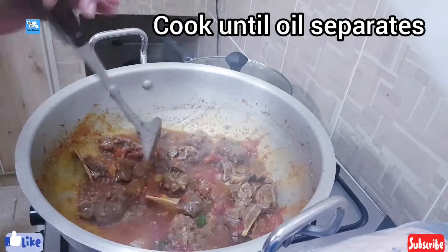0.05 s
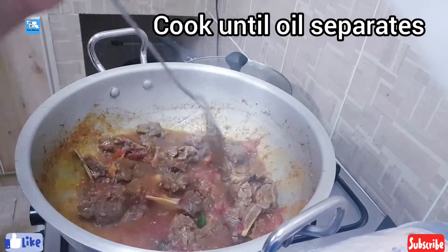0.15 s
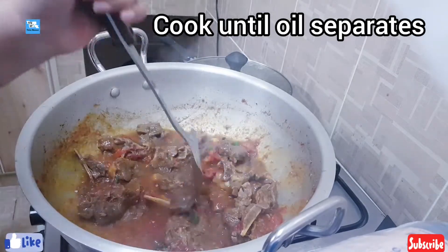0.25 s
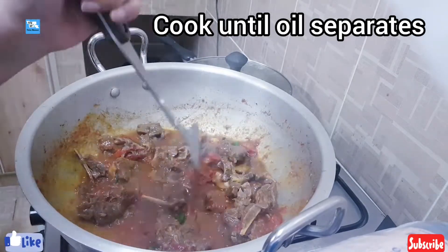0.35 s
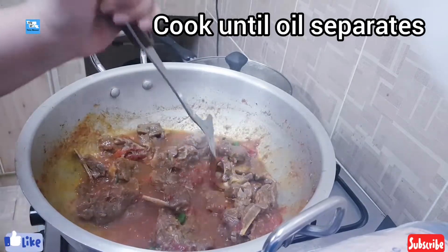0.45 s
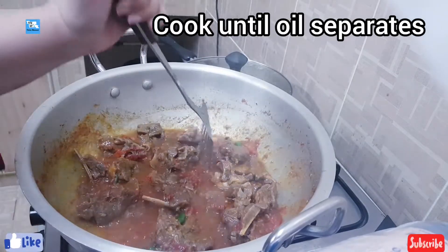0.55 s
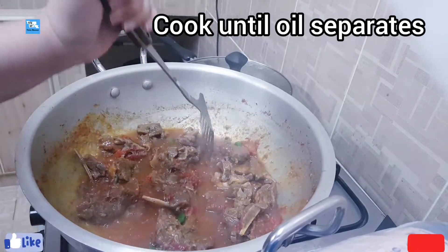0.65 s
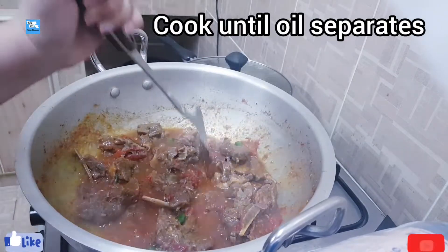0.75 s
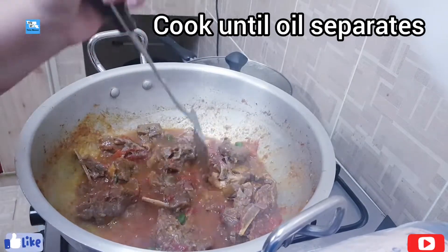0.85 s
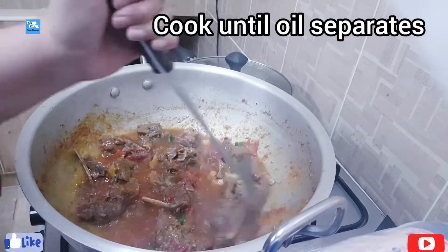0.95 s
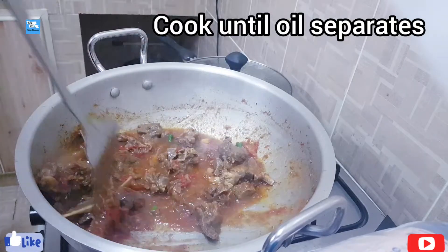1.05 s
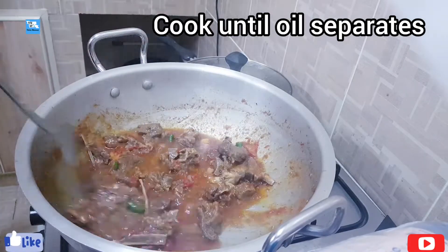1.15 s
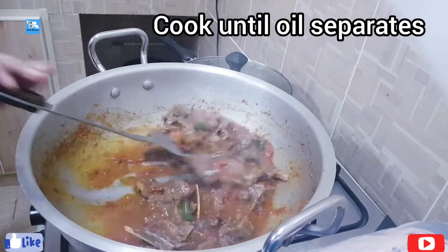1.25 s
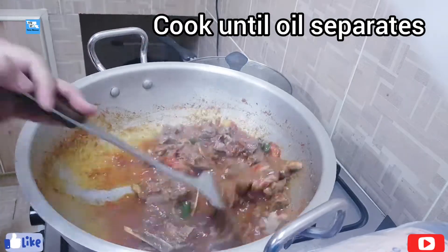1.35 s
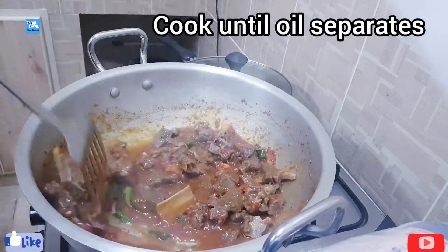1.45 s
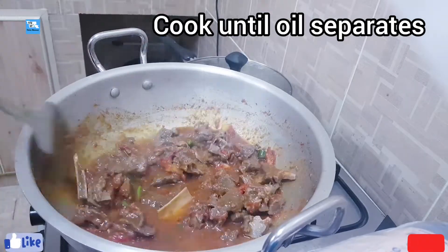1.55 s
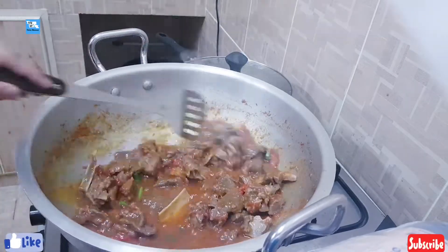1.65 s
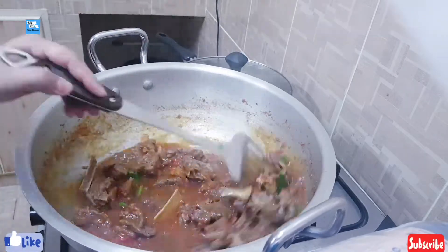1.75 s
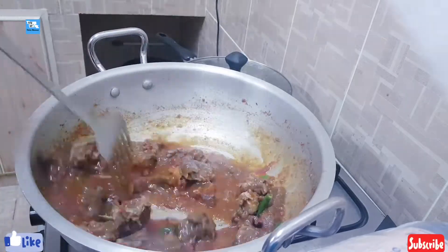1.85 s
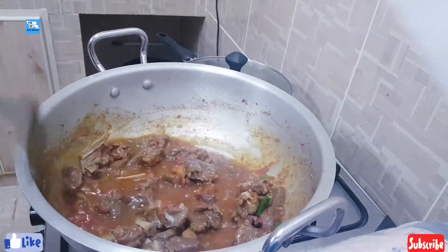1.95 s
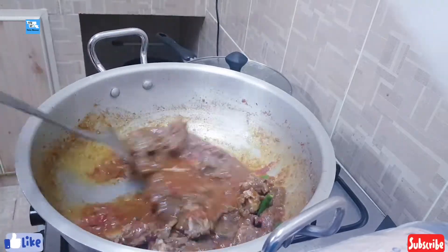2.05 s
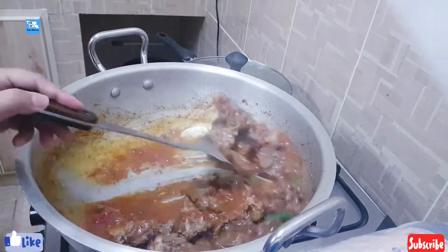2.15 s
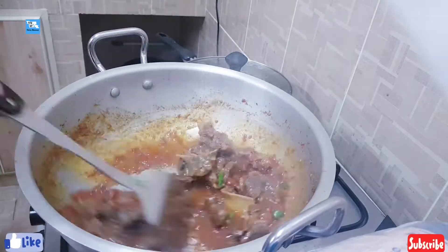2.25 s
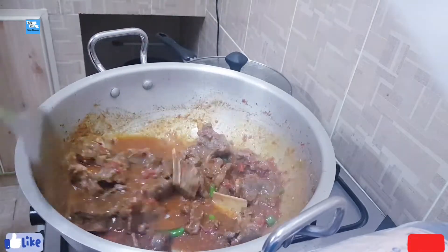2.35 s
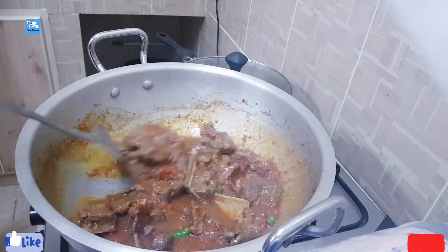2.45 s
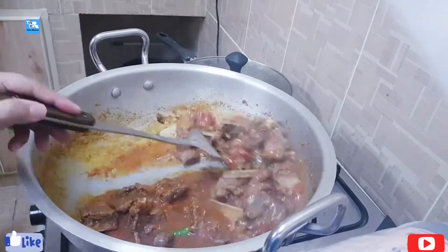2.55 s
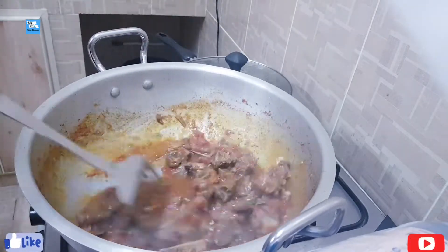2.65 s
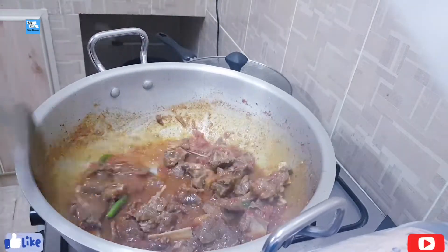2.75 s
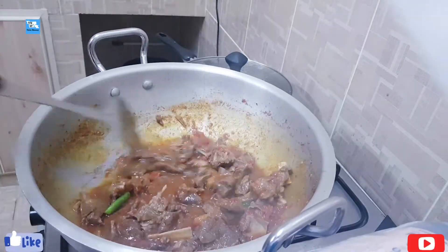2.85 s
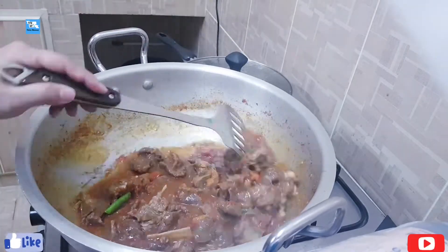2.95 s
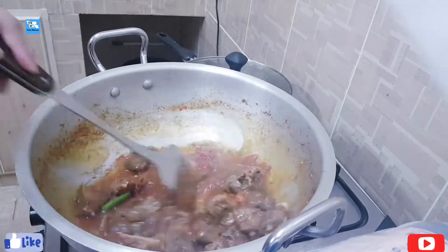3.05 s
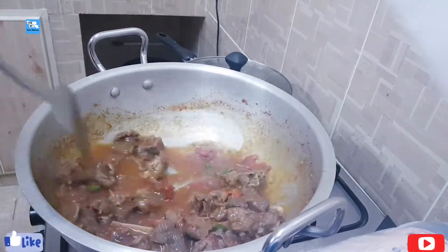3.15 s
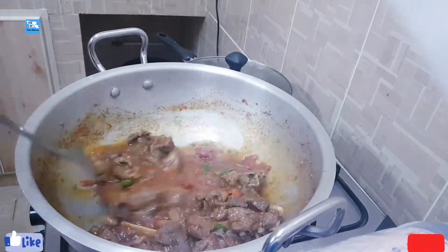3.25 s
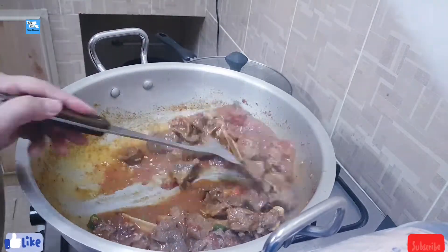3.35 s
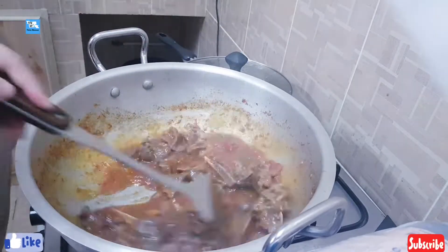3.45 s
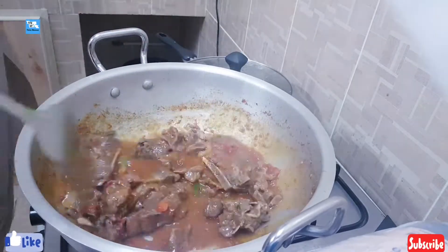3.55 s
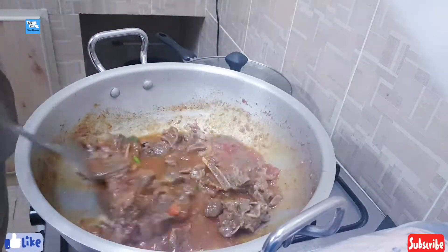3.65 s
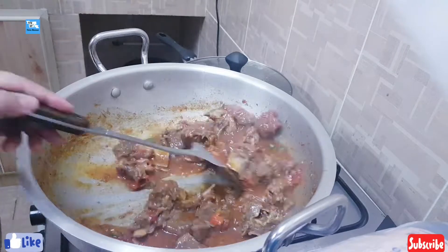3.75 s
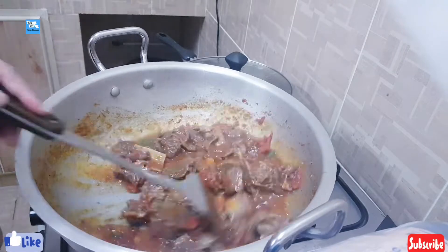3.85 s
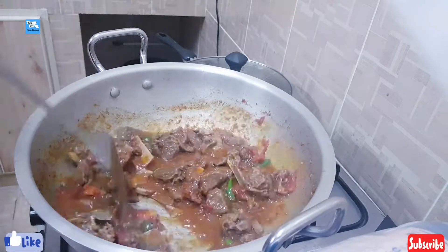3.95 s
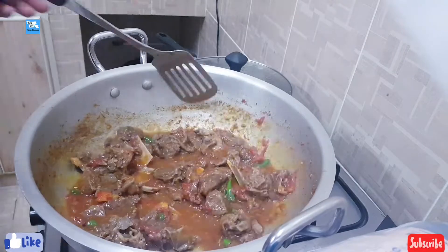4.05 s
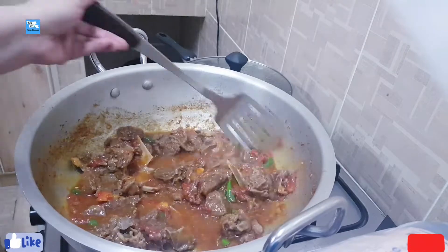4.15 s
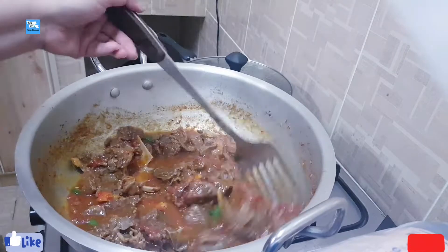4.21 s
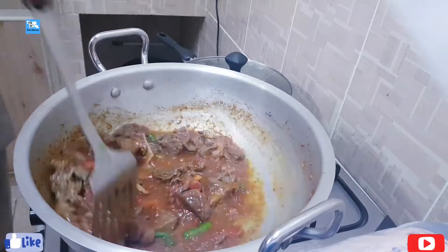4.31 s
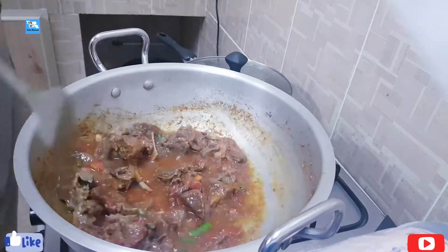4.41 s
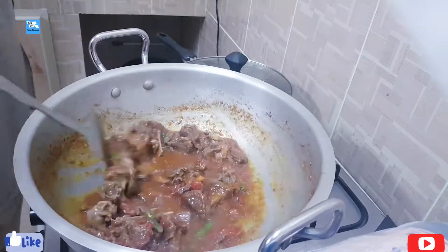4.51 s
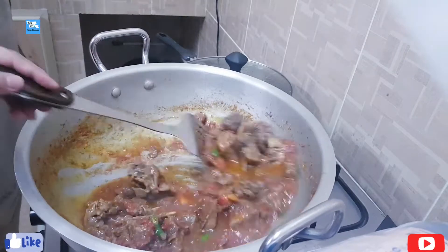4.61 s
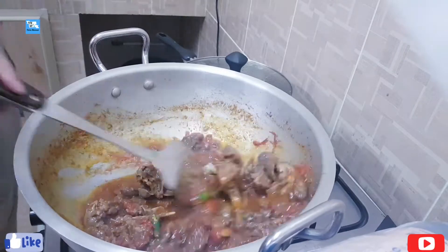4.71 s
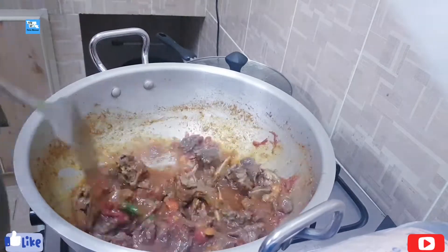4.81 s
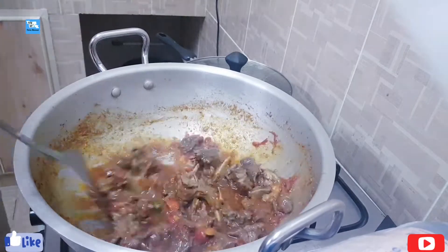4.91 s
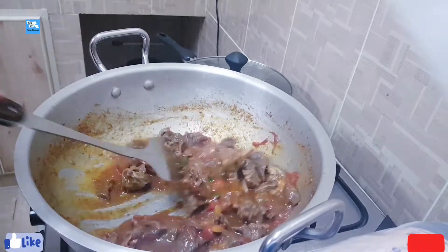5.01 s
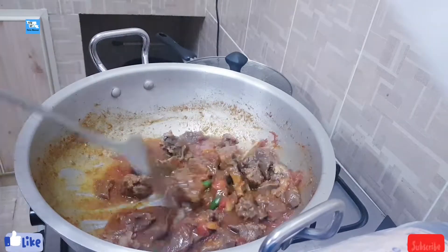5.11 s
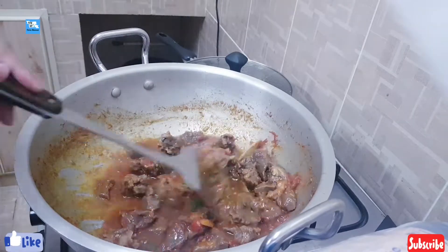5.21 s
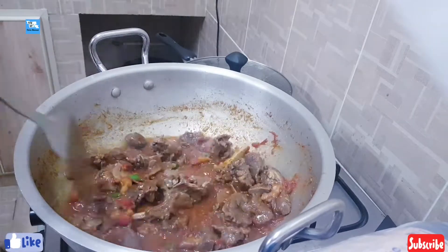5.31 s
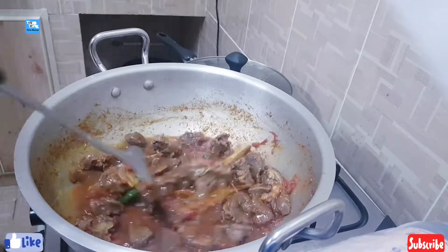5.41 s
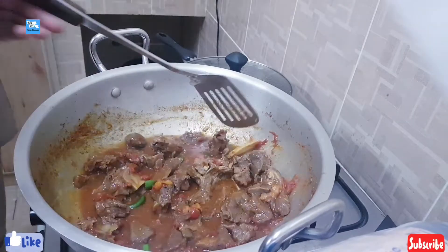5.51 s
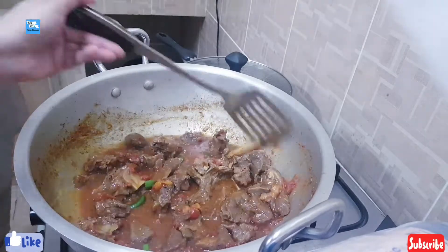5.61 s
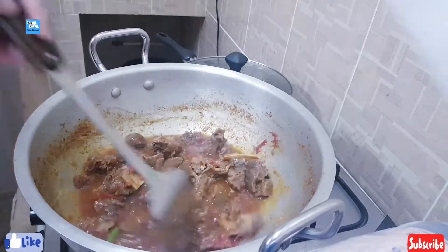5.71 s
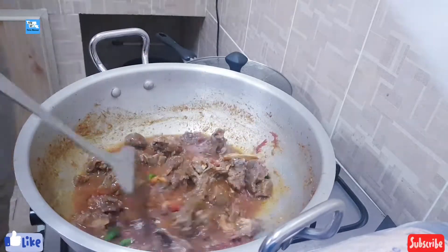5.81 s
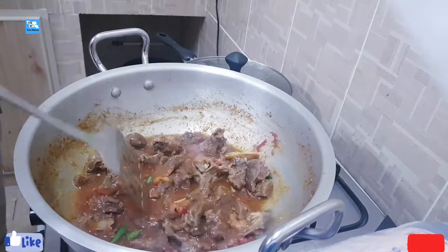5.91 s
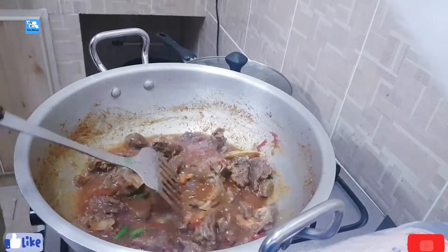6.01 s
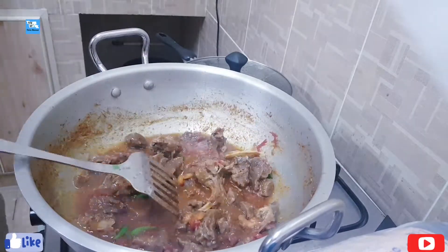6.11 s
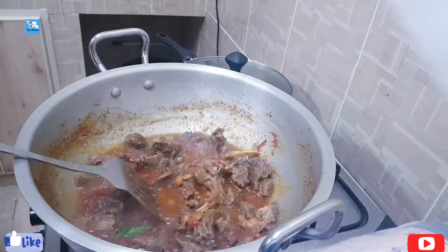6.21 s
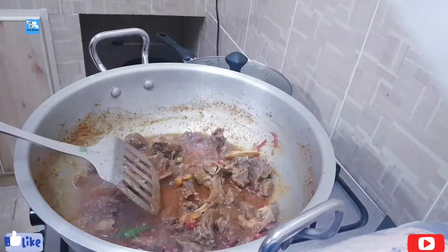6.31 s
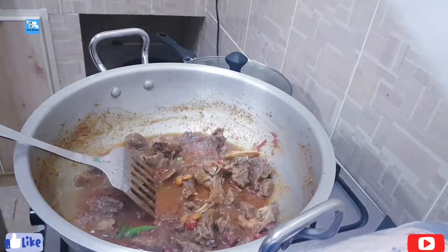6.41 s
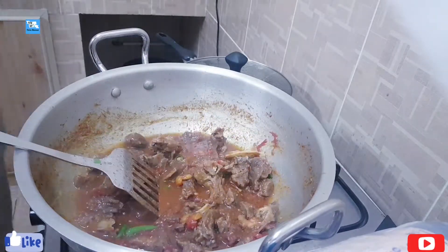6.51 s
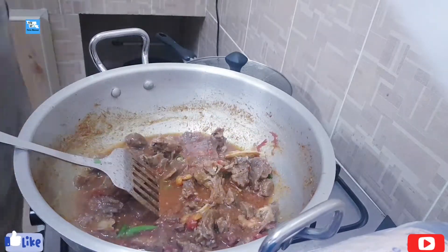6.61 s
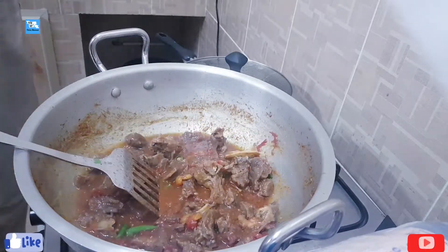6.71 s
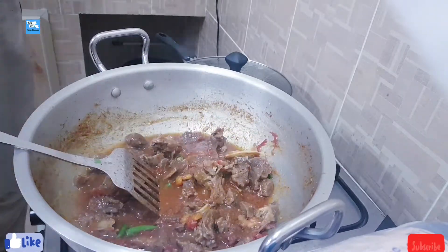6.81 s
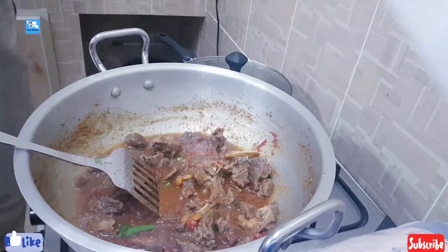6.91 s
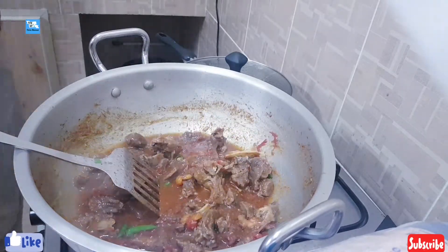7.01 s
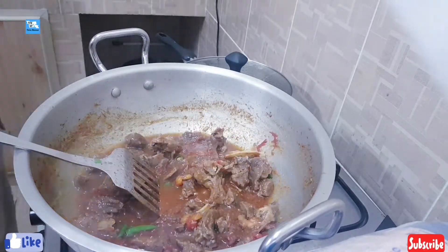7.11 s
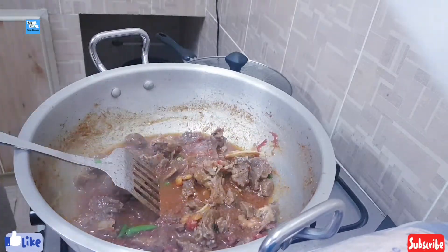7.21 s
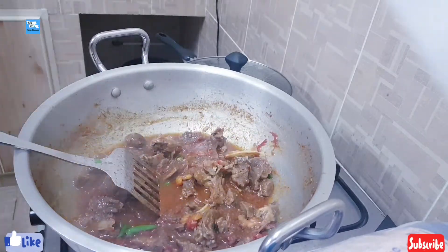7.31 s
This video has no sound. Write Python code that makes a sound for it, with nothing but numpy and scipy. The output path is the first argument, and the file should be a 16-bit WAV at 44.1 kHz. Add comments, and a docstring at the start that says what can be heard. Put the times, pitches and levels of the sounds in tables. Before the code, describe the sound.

Close stereo sound in a small hard-walled kitchen with a short, faint reflection. A fine, quiet sizzle and low burner rumble with a weak mains hum run throughout. From 0.27 to 0.9 s a steel spatula jabs through meat onto the bottom of a large aluminium pot in dull, gritty thumps, with a gulp of gravy. From 1.1 s it circles roughly every 0.4 s: a clank on the wall, a hissing scrape and a quieter draw-back. Heavy knocks fall near 1.6 s; the brightest clanks ring at 2.7 and 3.1 s, with low stuttering groans around 2.75 s. Clanks cluster at 4.0-4.4 s with a short squeak at 4.2; thumps follow at 4.5 and, strong and crunchy, 4.97 s. Scrapes grow softer, with a last squeak and rattle at 5.6 s. Small spits and faint touches follow until 6.4 s, then only sizzling and tiny gravy pops until about 7.4 s.

```python
"""On a kitchen stove, a steel spatula stirs meat in thick gravy in a big aluminium pot.
The blade clanks on the wall and jabs onto the bottom: random tiny contacts ring the pot's modes.
Its edge scrapes with a coloured hiss and sometimes groans in a regular stick-slip tone.
Gravy pops, spits and gulps as short chirps, crackles and low sines, over a sizzle of fine noise grains.
A low burner rumble and a mains hum lie beneath; a small tiled room answers with a short noise tail."""
import sys
import numpy as np
from scipy import signal
from scipy.fft import rfft, irfft
from scipy.io import wavfile
from scipy.ndimage import uniform_filter1d

SR = 44100
rng = np.random.default_rng(int(sys.argv[2]) if len(sys.argv) > 2 else 0)


def store_pcm(level_fs):
    """Save levels as 16-bit WAV."""
    pcm = np.round(np.clip(level_fs, -1, 1) * 32767).astype(np.int16)
    wavfile.write(sys.argv[1], SR, np.atleast_2d(pcm).T)


N = 324925
T = np.arange(N) / SR
LOCAL = T[:SR * 2 // 5]  # the clock of one short event, in seconds


def amp(db):
    """Turn decibels into gain."""
    return 10 ** (np.asarray(db) / 20)


def unit(x):
    """Scale a sound to an rms of 1."""
    return x / np.sqrt(np.mean(x ** 2))


def add(out, s, x):
    """Mix a stereo sound in at time s (seconds)."""
    start = max(int(s * SR), 0)
    out[:, start:start + x.shape[1]] += x[:, :N - start]


def walk(rate, t):
    """Random wavering around 0: straight lines between random points, rate points per second."""
    count = int(t[-1] * rate) + 2
    return np.interp(t * rate, np.arange(count), rng.standard_normal(count))


def through(x, response):
    """Pass a sound through a stereo response scaled to unit energy per side."""
    response = response / np.sqrt(np.sum(response ** 2) / 2)
    return signal.fftconvolve(np.atleast_2d(x), response, axes=1)[:, :x.shape[-1]]


def driven(x, response):
    """Ring a body so that it gives back just the energy put in."""
    y = through(x, response)
    energy_in, energy_out = np.sum(x ** 2), np.sum(y ** 2) / 2
    return y * np.sqrt(energy_in / (energy_out + 1e-18))


def colour(points, size=1024):
    """Make a short click with the given spectrum, its energy gathered at the start (minimum phase)."""
    hz, db = np.transpose(points)
    bins_hz = np.arange(size // 2 + 1) * SR / size
    log_gain = np.interp(np.log(bins_hz + 1), np.log(hz), np.log(amp(db)))
    cepstrum = irfft(log_gain)[:size // 2]
    cepstrum[1:] *= 2  # folding the cepstrum makes the response causal
    return irfft(np.exp(rfft(cepstrum, size)))


def stroke(rise_s, hold_s, fall_s):
    """Force of one stroke: it builds, holds and lets go."""
    build = np.minimum(LOCAL / max(rise_s, 1 / SR), 1)
    return build * np.exp(-np.maximum(LOCAL - hold_s, 0) / fall_s)


def slips(force, rate, spread_db):
    """Tiny slips of uneven size at random moments; together they carry the energy of the force curve."""
    n = len(force)
    happens = rng.random(n) < rate / SR
    size = amp(spread_db * rng.standard_normal(n))
    x = force * happens * rng.choice([-1, 1], n) * size
    return x * np.sqrt(np.sum(force ** 2) / (np.sum(x ** 2) + 1e-18))


def bowl(points, echo_db, echo_s, dull_hz=8000):
    """A coloured click and its quick, duller reflections inside the pot, different on each side."""
    t = LOCAL[:SR // 16]
    echoes = rng.standard_normal((2, len(t))) * np.exp(-t / echo_s)
    echoes *= amp(echo_db) / np.sqrt(np.sum(echoes ** 2) / 2)
    echoes = signal.lfilter(*signal.butter(1, dull_hz, fs=SR), echoes)  # the wet wall soaks up treble
    echoes[:, 0] += 1  # the click itself
    return signal.fftconvolve(echoes, colour(points)[None], axes=1)


# ways the free wall rings with the blade on it:
# [f/Hz, 60 dB decay time/s before division by the damping factor, relative level/dB]
WALL_MODES = [(499, 0.08, -18), (722, 0.12, 4), (980, 0.21, 4), (1073, 0.18, 12), (1446, 0.049, 5),
              (1630, .08, -51), (1764, 0.059, -0.5), (2076, 0.054, 5.5), (2413, 0.024, 2.5),
              (2626, 0.079, -1.5), (2820, .06, -17), (3148, 0.026, -1.5), (3184, 0.054, 1),
              (3740, 0.071, -2), (3980, 0.15, -4.5), (4190, 0.082, 4), (4440, 0.2, -32), (4680, 0.092, 6),
              (4900, .05, -29), (6230, 0.089, -3), (6600, 0.08, 7.5)]
# ways the bottom rings, damped by the food: the same columns [f/Hz, decay time/s, relative level/dB]
BOTTOM_MODES = [(211, 0.073, 7), (242, 0.018, -1), (329.5, 0.058, 7.5), (443, 0.043, -6), (505, 0.033, 10),
                (600, 0.027, 3), (750, 0.09, -3.5), (815, 0.041, 0), (900, 0.069, -2.5), (997, 0.12, -6),
                (1310, 0.1, -14), (1440, 0.075, -42), (1685, 0.1, -31), (2070, 0.076, -31)]


def modes(x, table, centre_hz, octaves, apart_hz=780, damping=0.66, alike_hz=110):
    """Contacts ring the pot: the spot touched favours modes near a centre; high ones differ in phase by side."""
    hz, t60, db = np.transpose(table)
    gain = amp(db) / np.sqrt(1 + (np.log2(hz / centre_hz) / octaves) ** 4)
    gain *= np.sqrt(np.sum(x ** 2) / np.sum(gain ** 2))  # share out the energy of the contacts
    poles = np.exp((2j * np.pi * hz - damping * np.log(1000) / t60) / SR)
    turns = rng.choice([-1, 1], len(hz)) * np.minimum(hz / apart_hz, 1) * np.pi / 4
    mid, side = 0, 0
    for pole, level, turn in zip(poles, gain, turns):
        ring = signal.lfilter([1], [1, -pole], x + 1e-18)
        level = level / np.sqrt(np.sum(ring.real ** 2))
        mid = mid + level * np.cos(turn) * ring.real
        side = side + level * np.sin(turn) * ring.imag
    side = signal.lfilter(*signal.butter(2, alike_hz, "high", fs=SR), side)  # bass is alike on both sides
    return np.array([mid + side, mid - side])


def kitchen(x, t60, wet_db, dull_hz):
    """Short diffuse answer of tiled walls: fading noise, different on each side, after a 6 ms gap."""
    fade = np.exp(-np.log(1000) * LOCAL / t60)
    tail = rng.standard_normal((2, len(LOCAL))) * fade * (LOCAL > .006)
    tail = signal.sosfilt(signal.butter(1, dull_hz, fs=SR, output="sos"), tail)
    return x + amp(wet_db) * through(x, tail)


# colour of the burner: [f/Hz, relative level/dB per Hz]
BURNER_COLOUR = [(20, -11), (45, 0.5), (75, 5.5), (130, 6), (200, -9.5), (400, -8.5), (1000, -57)]
# the low rumble swells while heavy food is shoved about: [t/s, level/dB]
RUMBLE_LEVEL = [(0.0, -43), (0.04, -48), (0.33, -41.5), (1.09, -48), (1.56, -37.5), (2.07, -47.5),
                (2.4, -42), (2.44, -42), (2.67, -37), (2.75, -52), (2.87, -38), (2.97, -53.5), (3.88, -45),
                (4.06, -50.5), (4.21, -43.5), (4.53, -52.5), (7.29, -46.5), (7.37, -54)]
HUM_HZ, HUM_DB = 98.4, -52  # the middle of the hum's wavering pitch and level


def stove():
    """Low rumble of burner and rocking pot as dark noise, with a wavering sine for the mains hum."""
    noise = rng.standard_normal(N) + 0.04 * rng.standard_normal((2, N))  # nearly alike on both sides
    rumble = unit(through(noise, np.tile(colour(BURNER_COLOUR, size=8192), (2, 1))))
    rumble_db = np.interp(T, *np.transpose(RUMBLE_LEVEL))
    hum_phase = 2 * np.pi * np.cumsum(HUM_HZ + 3.28 * walk(9, T)) / SR
    hum = np.sqrt(2) * np.sin(hum_phase)
    return rumble * amp(rumble_db) + hum * amp(HUM_DB + 2 * walk(6.5, T))


# colour of the simmering pot: [f/Hz, relative level/dB per Hz]
SIMMER_COLOUR = [(120, -26.5), (200, -8), (254, -6.5), (601, -1), (1100, -9), (1270, -6), (1810, -11),
                 (2860, -12), (3070, -13.5), (11700, -23), (16000, -26.5)]
# slow level curve of the steady background sizzle: [t/s, level/dB]
SIZZLE_LEVEL = [(0, -50), (.25, -45.5), (.7, -47.5), (3.1, -45.5), (5.1, -50), (5.5, -51.5), (6.3, -48.5),
                (6.6, -46), (7.37, -45.5)]


def simmer():
    """Fine sizzle all over the pot, made of tiny random grains; its low part is alike on both sides."""
    left, right, middle = (slips(amp(0.14 * walk(9.8, T)), rate=7000, spread_db=4) for _ in range(3))
    high_pass = signal.butter(1, 750, "high", fs=SR, output="sos")
    side = signal.sosfilt(high_pass, left - right) * 0.72
    grains = np.array([middle + side, middle - side])
    sizzle = through(grains, np.tile(colour(SIMMER_COLOUR), (2, 1)))
    return unit(sizzle) * amp(np.interp(T, *np.transpose(SIZZLE_LEVEL)))


def gravy(stirring, count=600):
    """Small air pockets pop in the gravy as rising chirps, more loudly while it is being moved."""
    out, t = np.zeros((2, N)), LOCAL[:SR // 30]
    motion = np.sqrt(np.abs(uniform_filter1d(stirring[0] ** 2, SR // 3)))
    for when, pitch, size, side in rng.random((count, 4)):
        hz = 450 * 2 ** (2.6 * pitch)
        # the pitch climbs as the pocket opens
        pop = np.sin(2 * np.pi * hz * t * (1 + 6 * t)) * np.exp(-t * hz / 1.2)
        stirred = min(motion[int(when * N)], amp(-42))
        gain = (amp(-40.5) + amp(-31) * stirred) * amp(-14 * size)
        add(out, when * N / SR, gain * np.sqrt([[side], [1 - side]]) * pop)
    return out


# gravy smacks and oil spits: [t/s, fall time/s, level/dB]
SPITS = [(0.154, 0.036, -41.5), (4.772, .004, -42), (4.856, 0.0039, -39.5), (5.811, 0.008, -43),
         (5.936, 0.0033, -41), (6.188, 0.0059, -49), (6.327, .0033, -50)]
# colour of a spit: [f/Hz, relative level/dB per Hz]
SPIT_COLOUR = [(500, -20), (2500, -3), (5000, 9), (8000, -2), (11000, 5), (16000, -11)]


def spits():
    """A film of gravy or oil bursts in a short bright crackle of random grains."""
    out = np.zeros((2, N))
    for s, fall, db in SPITS:
        burst = slips(stroke(.0005, .0005, fall), rate=4000, spread_db=3)
        add(out, s, amp(db) * driven(burst, bowl(SPIT_COLOUR, echo_db=10, echo_s=0.0017)))
    return out


# low gulps and thumps in the pot: [t/s, fall time/s, starting f/Hz, level/dB]
GULPS = [(0.281, 0.017, 235, -35), (1.234, 0.02, 159, -44), (1.626, 0.008, 173, -32),
         (1.692, 0.02, 230, -39.5), (2.492, 0.028, 151, -41), (2.558, 0.013, 221, -34.5),
         (2.860, 0.024, 139, -36), (3.303, 0.019, 390, -36.5), (3.834, 0.0046, 213, -35),
         (4.517, 0.012, 260, -29.5), (5.694, 0.02, 330, -40)]


def gulps():
    """Low gulps and thumps in the pot: a brief sine whose pitch wavers and sags."""
    out = np.zeros((2, N))
    for s, fall, hz, db in GULPS:
        pitch = hz * (1 + 0.016 * walk(144, LOCAL)) * np.exp(-2.5 * LOCAL)
        tone = unit(np.sin(2 * np.pi * np.cumsum(pitch) / SR))
        gulp = tone * stroke(0.006, 0.012, fall)
        add(out, s, np.tile(amp(db) * gulp, (2, 1)))
    return out


# the blade sticks and slips in step: [t/s, length/s, first f/Hz, last f/Hz, level/dB]
JUDDERS = [(2.718, 0.036, 196, 186, -27.5), (2.77, 0.036, 230, 206, -30), (2.808, 0.023, 205, 165, -22.5),
           (4.179, 0.027, 914, 740, -29), (5.59, 0.051, 837, 868, -29.5)]


def judders():
    """Regular stick-slip: a short groan or squeak with a weak overtone, wavering in pitch and level."""
    out = np.zeros((2, N))
    for s, length, first_hz, last_hz, db in JUDDERS:
        glide = np.interp(LOCAL, [0, length], [first_hz, last_hz])
        hz = glide * (1 + 0.036 * walk(156, LOCAL))
        phase = 2 * np.pi * np.cumsum(hz) / SR
        tone = unit(np.sin(phase) + amp(-20) * np.sin(2 * phase))
        level = amp(db + 1.7 * walk(110, LOCAL)) * stroke(0.0047, length, 0.0019)
        add(out, s, np.tile(level * tone, (2, 1)))
    return out


def sliding(x, depth, near_s=0.00025, far_s=0.000743):
    """The contact travels, so the wall's reflection comes with a changing delay and the colour sweeps."""
    lag = np.interp(LOCAL, [0, .15], rng.uniform(near_s, far_s, 2))
    reflection = np.interp(LOCAL - lag, LOCAL, x)
    return (x + depth * reflection) / np.hypot(1, depth)


# colour of steel rubbing on aluminium: [f/Hz, relative level/dB per Hz]
STEEL_COLOUR = [(150, -24), (400, 7), (1000, 9.5), (2000, 8), (3300, 2.5), (4500, 7.5), (6700, 7.5),
                (8300, 0.5), (11500, 6), (16000, -1.5)]
SINK_DB_PER_S = 18  # the hiss fades as the pushed edge sinks into the food


def scrape(length, hiss_db, ring_db, count=3):
    """The edge drags on a few spots with wavering pressure: it hisses, hums the wall, catches on the bottom."""
    force = stroke(0.008, length, 0.036) * amp(2.0 * walk(66, LOCAL))
    spots = []
    for _ in range(count):
        grains = slips(force, rate=1100, spread_db=4.0)
        spots.append(sliding(grains, depth=0.4) / np.sqrt(count))
    catches = slips(force, rate=460, spread_db=2)
    # the pressed blade damps the pot more than a free stroke does
    wall = 0.24 * modes(sum(spots), WALL_MODES, 2000, octaves=1.8, damping=0.93)
    bottom = 0.37 * modes(catches, BOTTOM_MODES, 880, octaves=0.92, damping=1.14)
    hiss = sum(driven(grains, bowl(STEEL_COLOUR, echo_db=9, echo_s=0.0082)) for grains in spots)
    return amp(hiss_db - SINK_DB_PER_S * LOCAL) * hiss + amp(ring_db) * (wall + bottom)


# turns of the spatula round the pot:
# [t/s, push length/s, starting hiss level/dB, pot ring gain/dB, delay of the draw-back/s]
TURNS = [(1.106, 0.11, -33.5, -31, 0.21), (1.486, 0.053, -32.5, -31.5, 0.25),
         (1.944, 0.13, -34.5, -36.5, 0.2), (2.344, .14, -32.5, -31.5, .21), (2.742, 0.04, -34.5, -29, .22),
         (3.181, .12, -33.5, -35.5, 0.2), (3.576, 0.15, -32, -35, 0.23), (4.044, 0.16, -37.5, -41, 0.16),
         (4.413, 0.16, -35, -33, .245), (4.851, 0.093, -45.5, -56, 0.16), (5.214, 0.027, -44, -45, 0.14),
         (5.586, 0.076, -52, -31.5, 0.2)]
BACK_S, BACK_HISS_DB, BACK_RING_DB = 0.056, -6, -13.5  # draw-back: length, levels relative to the push


def scrapes():
    """Every turn is a push along the metal, then a quieter draw-back."""
    out = np.zeros((2, N))
    for s, length, hiss_db, ring_db, back_after in TURNS:
        add(out, s, scrape(length, hiss_db, ring_db))
        add(out, s + back_after, scrape(BACK_S, hiss_db + BACK_HISS_DB, ring_db + BACK_RING_DB))
    return out


# the blade jabs through meat onto the bottom:
# [t/s, rise time/s, fall time/s, body level/dB, grit gain/dB, body centre f/Hz]
JABS = [(.273, 0.012, 0.032, -28.5, -68, 425), (0.365, 0.017, 0.022, -22.5, -21.5, 610),
        (.434, 0.014, 0.026, -33, -22.5, 695), (.510, 0.0068, 0.037, -32.5, -35, 990),
        (.712, 0.017, 0.026, -28.5, -38, 810), (.759, 0.016, 0.021, -25, -19, 460),
        (.889, 0.0013, .016, -21, -24.5, 670), (1.305, 0.0032, 0.012, -31.5, -35, 210),
        (1.557, 0.0086, 0.041, -20.5, -26.5, 615), (1.584, 0.0012, 0.038, -19, -37, 740),
        (1.660, .0065, 0.0085, -26, -49, 950), (1.912, 0.0061, 0.018, -31.5, -44, 540),
        (2.134, 0.0062, 0.023, -31.5, -37, 650), (2.544, 0.0037, .008, -33, -46, 900),
        (2.798, 0.012, 0.069, -29.5, -55, 430), (2.833, .007, 0.024, -22, -40, 750),
        (3.051, 0.002, .003, -34, -39, 990), (3.208, 0.015, 0.025, -38, -33.5, 1200),
        (3.625, 0.0025, 0.014, -37.5, -22.5, 650), (3.816, 0.022, 0.023, -36.5, -35.5, 238),
        (4.178, 0.011, 0.034, -25.5, -40.5, 920), (4.472, 0.025, 0.016, -20, -30, 664),
        (4.507, 0.006, 0.024, -20, -32, 575), (4.974, 0.0096, .011, -16, -21, 554),
        (5.634, 0.016, 0.023, -33, -34, 720), (6.337, .01, 0.029, -38.5, -56, 680),
        (6.437, 0.0081, 0.023, -43, -40, 800)]
# colour of the edge rasping through meat and bone: [f/Hz, relative level/dB per Hz]
RASP_COLOUR = [(150, -20), (400, 7.5), (900, 1.5), (1900, -3), (3200, -9), (4500, -6), (6700, -4.5),
               (8300, -13.5), (11000, -13), (16000, -18)]
BODY_OCTAVES, GRIT_OCTAVES = 0.29, 0.32  # spread of the thump round its centre, and widening by grit


def jabs():
    """The edge crunches through meat and bone: coarse slips thump the bottom, coarse and fine ones rasp."""
    out = np.zeros((2, N))
    for s, rise, fall, body_db, grit_db, hz in JABS:
        force = stroke(rise, rise, fall)
        coarse = slips(force, rate=1500, spread_db=0.0)
        fine = slips(force, rate=6600, spread_db=4.0)
        # the grittier the jab, the more of the bottom's modes it reaches
        octaves = BODY_OCTAVES + GRIT_OCTAVES * min(amp(grit_db - body_db), 1)
        add(out, s, amp(body_db) * modes(coarse, BOTTOM_MODES, hz, octaves))
        for grains in (0.82 * coarse, fine):
            add(out, s, amp(grit_db) * driven(grains, bowl(RASP_COLOUR, echo_db=35, echo_s=0.0043)))
    return out


# the blade lands on the bare wall:
# [t/s, chatter length/s, ring level/dB, steel clash level/dB, brightest ring f/Hz, spread/octaves]
CLANKS = [(1.066, 0.025, -28.5, -37.5, 3240, 0.58), (1.467, 0.023, -27, -23.5, 2740, 0.35),
          (1.91, 0.018, -25.5, -60, 2390, 0.32), (2.32, 0.03, -29, -38, 2550, 0.14),
          (2.716, 0.022, -19, -18.5, 2700, 0.34), (3.143, 0.0089, -16.5, -22.5, 2530, 0.15),
          (3.527, 0.03, -28, -47, 2150, 0.87), (4.017, 0.026, -21.5, -35, 1050, 0.77),
          (4.07, 0.029, -28.5, -31.5, 2780, 0.077), (4.119, 0.0097, -25.5, -36, 1040, .18),
          (4.222, 0.017, -28, -58, 1290, 0.75), (4.386, .034, -31, -38, 2800, 0.62),
          (4.971, 0.015, -25, -40, 1636, 0.07), (5.548, 0.011, -36.5, -25, 1300, 0.88),
          (5.57, 0.056, -35, -35, 2580, 0.65), (5.642, 0.031, -29.5, -35, 1200, 1.1),
          (6.137, 0.021, -47, -53, 2680, 0.12)]
# colour of the blade hitting bare metal: [f/Hz, relative level/dB per Hz]
CLASH_COLOUR = [(200, 2), (500, 11), (1200, 10), (2400, 8.5), (3300, -1), (4500, 6), (6800, 13.5),
                (8300, 1.5), (11300, 13), (16000, 2)]
KNOCK_DB = -12.5  # dull knock of the bottom, relative to the wall's ring


def clanks():
    """The springy blade chatters on the wall for a moment and sets wall and bottom ringing."""
    out = np.zeros((2, N))
    for s, length, ring_db, clash_db, hz, octaves in CLANKS:
        force = stroke(0.00049, length * 0.54, length * .5)
        contacts = slips(force, rate=3500, spread_db=1.0)
        clash = driven(contacts, bowl(CLASH_COLOUR, echo_db=25.0, echo_s=0.002))
        add(out, s, amp(ring_db) * modes(contacts, WALL_MODES, hz, octaves))
        add(out, s, amp(clash_db) * clash)
        add(out, s, amp(ring_db + KNOCK_DB) * modes(contacts, BOTTOM_MODES, 500, octaves=0.37))
    return out


def scene():
    """Spatula and gravy sound in the tiled room; simmer and stove are added without its answer."""
    stirring = gulps() + judders() + scrapes() + jabs() + clanks()
    pot = stirring + spits() + gravy(stirring)
    return simmer() + stove() + kitchen(pot, t60=0.34, wet_db=-16.0, dull_hz=8850)


# how the two sides differ in colour: [f/Hz, left minus right level/dB]
BALANCE = [(60, 2), (170, -4), (350, 2.5), (650, -1), (1300, -0.5), (5000, -1), (9000, 1.5), (15000, 2.5)]
TOP_HZ = 16100  # hardly anything is left above this


def record(dry):
    """Left and right get slightly different colours, half the difference each; the very top is cut."""
    hz, db = np.transpose(BALANCE)
    lean = np.interp(np.log(np.fft.rfftfreq(N, 1 / SR) + 1), np.log(hz), db) / 2
    sides = irfft(rfft(dry) * amp([lean, -lean]), N)
    return signal.sosfilt(signal.ellip(10, .2, 80, TOP_HZ, fs=SR, output="sos"), sides)


dry = scene()
out = record(dry)
store_pcm(out)
```